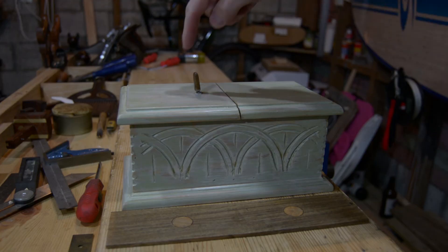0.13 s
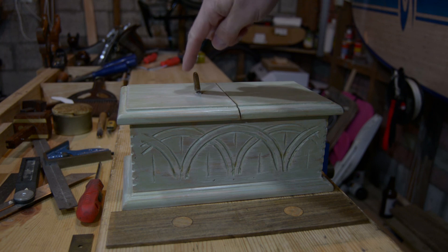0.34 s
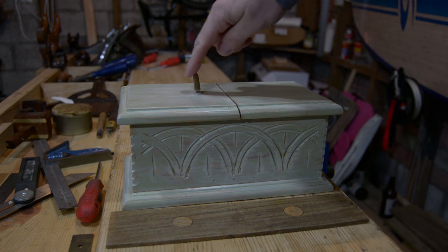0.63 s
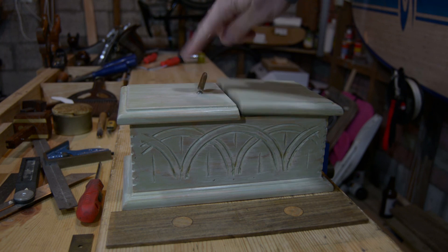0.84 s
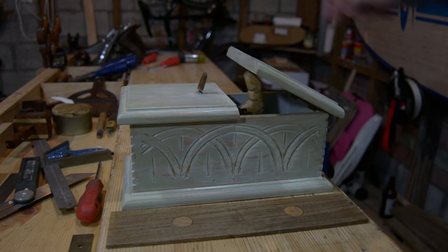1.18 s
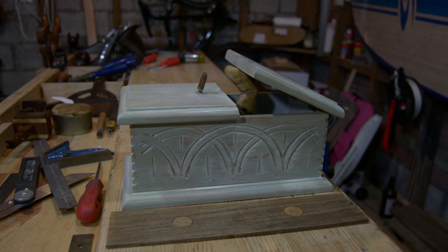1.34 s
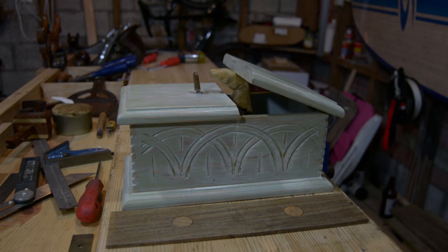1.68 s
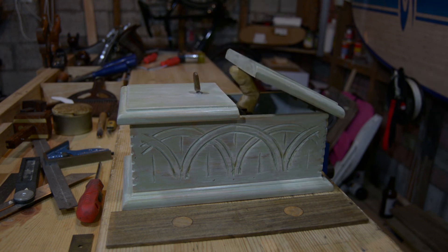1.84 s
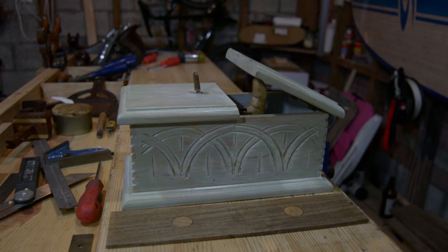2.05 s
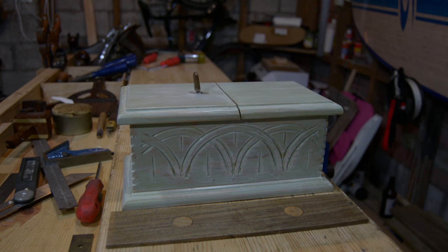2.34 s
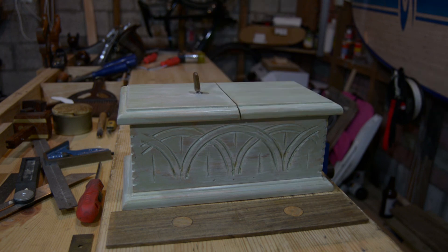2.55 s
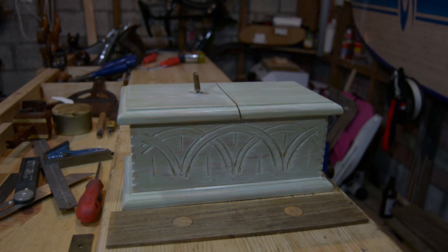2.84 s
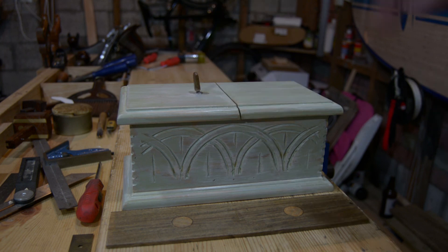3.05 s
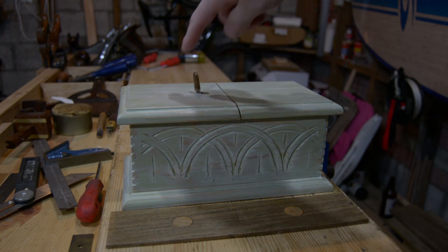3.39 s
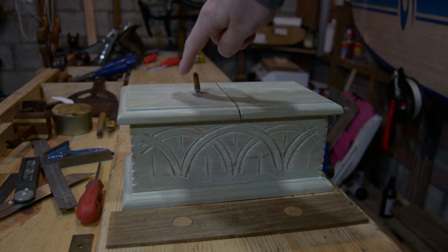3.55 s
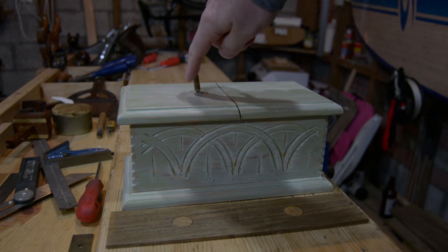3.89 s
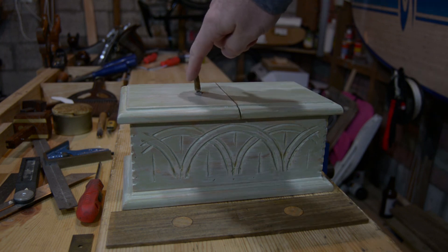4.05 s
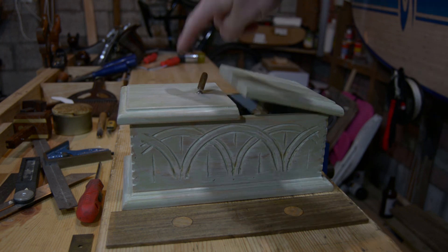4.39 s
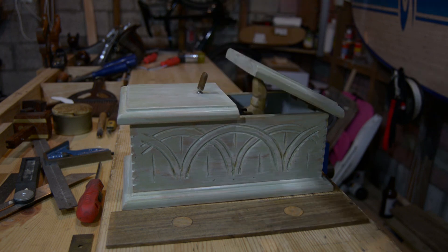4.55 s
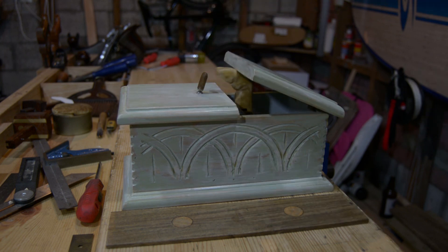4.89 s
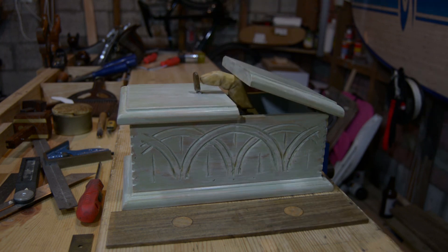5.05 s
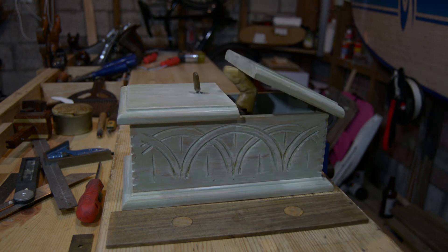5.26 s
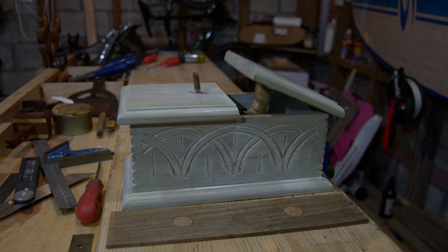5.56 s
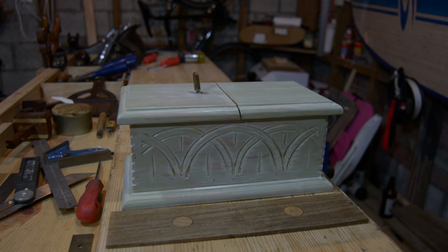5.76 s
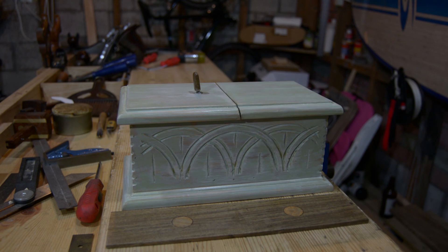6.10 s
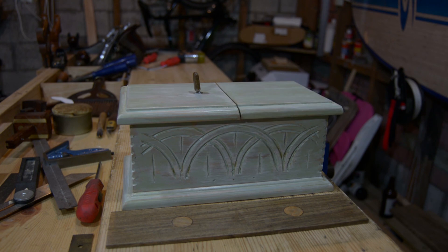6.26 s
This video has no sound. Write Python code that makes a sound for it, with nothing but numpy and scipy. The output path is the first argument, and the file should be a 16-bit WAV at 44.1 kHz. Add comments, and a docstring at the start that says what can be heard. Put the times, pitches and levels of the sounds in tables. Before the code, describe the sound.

A close microphone in a small, fairly dry workshop, with very quiet air and faint hum. A soft sleeve rustle opens, with tiny ticks near 0.7 s. At 0.78 s a toggle switch snaps on and a small geared servo starts at once, whining and buzzing; its arm knocks the wooden lid at 0.82 s. The whir sags under load, then runs freely with a rattly plastic edge. Clunks on the lever at 1.34-1.58 s lead to a loud snap at 1.6 s. The motor reverses, slightly higher, with the lid chattering on the retreating arm, until it claps shut at 2.29 s, bounces and rings briefly. Small ticks follow, then quiet with faint rustles and ticks from about 3.1 s. The cycle repeats: snap at 4.25 s, knock at 4.29 s, clunks from 4.8 s, snap back at 5.07 s, chatter, and final clap at 5.76 s, a few ticks, then still air.

```python
"""On a bench in a small workshop, a wooden box switches itself off, twice. A sleeve rustles, a finger
flips the toggle switch and a small geared servo whirs: its arm knocks the lid up, pushes the switch
back and retreats until the lid claps shut. Tooth-rate harmonics make the whine and uneven tooth blows
the rattle of walls and gear case; coloured noise bursts make the contacts, decaying modes the box's ring.
At the microphone the direct sound outweighs the room's short tail; still air and a faint hum lie below."""
import sys
import numpy as np
from scipy import signal
from scipy.fft import rfft, irfft, next_fast_len
from scipy.io import wavfile
from scipy.ndimage import uniform_filter1d, map_coordinates

SR = 44100
rng = np.random.default_rng(int(sys.argv[2]) if len(sys.argv) > 2 else 0)


def transcribe(signal):
    """Save signal, clipped to [-1, 1], as a 16-bit WAV file at the path in sys.argv[1]."""
    frames = np.atleast_2d(signal).T
    limited = np.clip(frames, -1, 1)
    pcm = np.round(limited * 32767).astype(np.int16)
    wavfile.write(sys.argv[1], SR, pcm)


N = 283563

# All levels are set ahead of the recorder; colours and rows are relative where a function adds a gain.
# Room tone: still air (frequency [Hz], relative level [dB]) and hum (frequency [Hz], mean level [dB])
AIR_COLOUR = [(20, -16), (50, -8), (80, -8), (115, -4), (150, -9.5), (300, -13), (450, -19), (800, -24.5),
              (2500, -31), (4000, -32.5), (6500, -36), (16000, -39)]
HUM_TONES = [(48.4, -85), (118.4, -74.5)]
AIR_DB = -72  # rms
# The workshop's decay: (frequency [Hz], t60 [s])
ROOM_DECAY = [(150, 0.45), (700, .26), (3000, .31), (6000, 0.36), (9000, 0.2), (14000, 0.12)]

# A sleeve rustles as the hand reaches for the switch: (time [s], relative level [dB])
SWISHES = [(0, -59), (.53, -71.5), (.73, -73.5), (3.12, -71.5), (3.34, -77.5), (3.73, -77)]
# Colour of the cloth: (frequency [Hz], level [dB])
CLOTH_COLOUR = [(150, -15.5), (500, -3.5), (1400, 1), (2300, -5.5), (3700, 0), (5000, -8.5), (8000, -16),
                (16000, -22.5)]
SWISH_RISE_DB_PER_S, SWISH_FALL_DB_PER_S = 163, 74.5

# Contacts, each: (time [s], relative level [dB], relative treble level [dB])
# followed by the colour of the struck body: (frequency [Hz], level [dB])
# light ticks of the switch lever and the settling gears
TICKS = [(.654, -56, -18.5), (.719, -48.5, 5.5), (.737, -53, 18.5), (2.452, -45.5, -6), (2.464, -42, 4.5),
         (3.327, -62.5, 0), (3.709, -62, -2), (3.74, -62, 4), (3.962, -62.5, -2.5), (3.986, -57.5, 6),
         (4.001, -59.5, 7), (4.153, -55, -9.5), (4.176, -60, 5), (4.19, -63, -11), (5.918, -40.5, -7),
         (5.927, -42, 3), (5.934, -47, -3)]
TICK_COLOUR = [(200, -11), (900, 2), (1700, -3), (3200, 1.5), (4500, -10), (10000, -19), (16000, -26.5)]
# the toggle switch snaps on and off
SNAPS = [(0.78, -25, 1.5), (1.603, -21.5, -1), (4.254, -24, 4), (5.071, -22.5, -8)]
SWITCH_COLOUR = [(120, -41.5), (200, -12.5), (456, -21.5), (763, -1), (968, -5), (1200, -11), (1500, -4.5),
                 (1800, 0), (2000, -5), (2250, -3), (2560, -20), (3190, -11), (4680, -20.5), (7010, -34.5),
                 (7830, -32.5), (9930, -26), (16000, -40)]
# the arm knocks and slips against the lid
KNOCKS = [(.821, -22.5, -4.5), (.828, -26, -13.5), (.851, -36.5, 7.5), (4.294, -24, -18.5),
          (4.301, -27.5, -2), (4.323, -37.5, 12.5)]
LID_COLOUR = [(90, -35), (160, -9.5), (260, -18), (380, -7.5), (560, -12), (800, -8), (1000, 9), (1250, -9),
              (1900, -8.5), (3300, -12), (5000, -32.5), (10000, -22.5), (16000, -34.5)]
# the box rocks softly on the bench
BUMPS = [(.895, -55.5, -1), (3.058, -58, 0), (3.99, -57, 2), (4.368, -39.5, -1.5)]
BENCH_COLOUR = [(40, -22), (90, -7), (170, -0.5), (300, -6.5), (500, -21), (2000, -18.5), (8000, -57)]
# the arm clunks against the switch lever and leans on it
CLUNKS = [(1.341, -34.5, 10.5), (1.449, -37.5, -8), (1.466, -34.5, 0), (1.524, -38.5, 9.5),
          (1.58, -38.5, -3), (4.81, -32, 15), (4.917, -35.5, 1), (4.936, -36, -4), (4.992, -33.5, 21),
          (5.048, -38, 7)]
ARM_COLOUR = [(100, -26.5), (280, -18.5), (380, 2.5), (520, -12.5), (700, -5), (860, -1.5), (1100, -11),
              (1600, -11.5), (2500, -15.5), (6000, -25), (16000, -41)]
# the retreating arm and the lid resting on it chatter
CHATTERS = [(1.638, -31.5, -9), (1.73, -31.5, -9), (1.863, -31.5, -9), (1.885, -30.5, -9),
            (2.1003, -36, -2), (2.12, -32.5, -7), (2.136, -31.5, -8), (2.1541, -32, -6),
            (2.1726, -32.5, -4), (2.1945, -28.5, -6), (2.2145, -34, -5), (2.2589, -36, 2),
            (5.108, -31, -12), (5.15, -30, -9), (5.187, -29, -10), (5.354, -28, -6), (5.384, -31, -6),
            (5.5378, -34.5, -1), (5.5747, -36, 2), (5.5867, -31, -3), (5.6052, -30, -2),
            (5.6411, -29.5, -2), (5.7314, -31, 5)]
CHATTER_COLOUR = [(300, -22), (900, 2), (1300, -4.5), (2800, 3.5), (4500, -8), (7500, -15), (10500, -13.5),
                  (16000, -22)]
# the lid bounces after each clap
BOUNCES = [(2.2978, -21, -12.5), (2.3077, -37, 16.5), (2.313, -29, -12.5), (2.329, -33, -12),
           (5.7668, -20, -10), (5.7795, -28.5, -3.5)]
WOOD_COLOUR = [(40, -35.5), (105, -29.5), (150, -2.5), (220, -2), (280, -5.5), (520, -7.5), (720, -4),
               (1000, -1.5), (1600, -6.5), (2500, -5.5), (3700, -6), (4500, -18), (10500, -21),
               (16000, -35.5)]
# The lid claps on the box: (time [s], relative level [dB])
CLAPS = [(2.292, -17.5), (5.76, -17.5)]
# Modes of the shut box: (frequency [Hz], relative level [dB], t60 [s])
BOX_MODES = [(185, 9.5, .06), (174.5, 2, 0.34), (226.7, 4, 0.34), (323, -2, 0.5), (372.5, 2, 0.42),
             (575, -5, 0.38), (888, 3, 0.21), (930, 2, .15), (1020, -2.5, 0.39), (1336, -7, .2),
             (1530, -7, .22), (1910, -9.5, .26), (2810, -1.5, .15), (3370, -8, .2), (3880, -8.5, .2),
             (4000, -5, 0.51), (4100, -1.5, 0.33)]

# The motor is powered: (start [s], reversal [s], stop [s])
RUNS = [(.771, 1.604, 2.293), (4.245, 5.073, 5.76)]
# The servo running free, out and back: (tooth rate [Hz], share of it reached at once, spin-up [s],
# wooden walls [dB], gear case [dB], tooth fizz [dB], second, third and fourth harmonic [dB]), all relative
OUT = (1512, .5, 0.03, -52.5, -41, -46.5, -9.5, -6, -12.5)
BACK = (1606, 0.44, 0.0369, -44.5, -37.5, -48.5, -3, -14, -22)
# What the arm meets in every run, by row: heaves the lid open; takes its full weight; jolt of setting it
# moving; raised lid buzzes on the arm; slack; grinds on the lever; pushes the switch over; lever gives way;
# strains gathering speed backwards; slides back under the lid; sinking lid pushes the arm; slack again;
# whine thins a little; judders under the lid's weight; teeth scrape as the lid leaves the arm.
# (time after start [s], attack [s], hold [s], release [s], sag [Hz], walls [dB], case [dB], fizz [dB],
# second, third and fourth harmonic [dB]); a negative sag speeds the gears up
LOADS = [(.066, .03, .102, .15, 285, -3, 8, 5, 8.5, 2.5, 5),
         (.08, .024, .014, .03, 80, -1, 2, -1, -4, 6, 7),
         (.045, .02, .015, .012, 0, 2.5, 3, -1, -0.5, 5.5, -1.5),
         (.248, 0.033, 0.027, 0.097, 0, 7, 0.5, 0, 1.5, -2.5, -3),
         (.689, .03, .015, .02, -15.5, 1.5, -3, -4.5, -1.5, 0, -1),
         (.745, .016, .03, .02, -45, 6.5, 4.5, 6, 5, 2, 9),
         (.76, .028, .035, .008, 140, -3, 5, 0.5, 4.5, 0.5, 3.5),
         (.802, .02, .008, .012, 150, -3, -1.5, -6.5, -13, -4, -15),
         (.852, 0.022, .01, 0.052, 0, 1.5, 4, 0, 4, 9, 14), (.972, .07, .01, .07, 66, 0.5, 2.5, 2, 6, 4, 0),
         (1.25, .25, .03, .02, -95, -2.5, -7, -3, -16, -5, -12),
         (1.279, .04, .003, .035, -20, -1, -6, -6, -7, .5, 0),
         (1.12, .03, .1, .03, 0, -0.5, -0.5, -0.5, -2.5, 0, 0),
         (1.347, .03, .04, .03, 0, 4, 1, -3, 1.5, 0, 0), (1.465, .025, .02, .02, 0, -5, -1, 1.5, 3, 0, 0)]
GRIP = 2.8  # how soon a growing load presses the teeth fully together
WALLS_DB_PER_OCTAVE, CASE_DB_PER_OCTAVE, FIZZ_DB_PER_OCTAVE = 8, 7.5, 12.5  # faster gears are louder
WAVER, WAVER_PER_S = .014, 20  # random share of the outward speed, knots a second
# Whine of a harmonic as it crosses resonances of the gear case: (frequency [Hz], relative level [dB])
WHINE = [(1200, -58.5), (1400, -56), (1500, -54.5), (1560, -53.5), (1610, -47.5), (1680, -55), (2000, -54),
         (2280, -45.5), (2430, -35.5), (2570, -41), (2740, -31.5), (3000, -38), (3200, -41.5), (3410, -32),
         (3560, -37.5), (3720, -34), (3900, -41), (4150, -44), (4900, -55.5), (5400, -47), (5750, -40),
         (6300, -48)]
# Colours of the rattling walls, gear case and tooth fizz, out and back: (frequency [Hz], level [dB])
WALLS_OUT = [(65, -49.5), (110, -4), (275, -29), (378, -0.5), (493, -18.5), (575, -11.5), (751, -10.5),
             (831, 2), (993, -9), (1400, -7), (1490, -4.5), (1780, -4.5), (1950, -2.5), (2190, -12),
             (2300, -1.5), (2990, -30.5), (5060, -120)]
WALLS_BACK = [(65, -55), (110, -16.5), (155, -14), (242, -27), (378, -9.5), (408, -12.5), (560, -19),
              (820, 2), (909, -4), (1020, 3.5), (1190, -8.5), (1470, -7.5), (1650, 3.5), (2080, -6),
              (2300, -10), (2990, -38), (5060, -120)]
CASE_OUT = [(1240, -37), (2100, -17), (2230, -23), (2440, 3), (2900, 4.5), (3170, -8), (3350, 8), (3590, 4),
            (4020, -5.5), (4390, -4.5), (4800, -21.5), (6240, -45.5), (10600, -120)]
CASE_BACK = [(1240, -42.5), (2100, -16), (2430, 0), (2620, -2), (2830, 5.5), (3080, -4), (3200, -1.5),
             (3380, -4.5), (3720, -5), (4490, -14.5), (4800, -19), (6240, -51), (10600, -120)]
FIZZ_OUT = [(3200, -27.5), (4500, -9.5), (4950, -1.5), (5450, 4), (6000, -1.5), (6550, 2.5), (7400, -9),
            (8000, -5.5), (8700, -10.5), (9500, -4.5), (10500, -9.5), (11300, -7), (12600, -14),
            (15800, -17)]
FIZZ_BACK = [(3200, -22), (4500, -2.5), (4950, 2), (5400, 2.5), (6150, -5), (6550, -1), (7050, -2.5),
             (7600, -8), (8600, -8), (9600, -3.5), (10500, -11), (11900, -4.5), (13300, -12), (15800, -15)]

TOP_HZ = 15900  # upper edge of the recorder's band


def amp(db):
    """Decibels to gain."""
    return 10 ** (np.asarray(db) / 20)


def unit(x):
    """Scale to rms 1."""
    return x / np.sqrt(np.mean(x ** 2) + 1e-20)


def along(points, hz):
    """Read (frequency [Hz], value) points on a log frequency axis."""
    f, v = np.transpose(points)
    return np.interp(np.log(hz + 1), np.log(f + 1), v)


def wobble(rate):
    """A smooth random curve with rate knots a second."""
    coarse = np.arange(0, N + 16, 16)
    knots = rng.standard_normal(int(N * rate / SR) + 4)
    curve = map_coordinates(knots, [coarse * rate / SR])
    return np.interp(np.arange(N), coarse, curve)


def coloured(x, spectrum, size=4096):
    """Pass x through a causal, minimum-phase body of the given colour."""
    level_db = along(spectrum, np.fft.rfftfreq(size, 1 / SR))
    cepstrum = irfft(np.log(amp(np.maximum(level_db, -100))))
    # folding the cepstrum forward makes the response causal
    cepstrum[1:size // 2] *= 2
    cepstrum[size // 2 + 1:] = 0
    response = irfft(np.exp(rfft(cepstrum)))
    return signal.fftconvolve(x, response)[:len(x)]


def add(track, s, sound):
    """Mix a sound into the track at s seconds."""
    part = track[round(s * SR):][:len(sound)]
    part += sound[:len(part)]


def impacts(turns, scatter, spread_db):
    """One impulse per whole count of turns, uneven in time, size and sign."""
    at = np.flatnonzero(np.diff(np.floor(turns)))
    late, size = rng.standard_normal((len(at), 2)).T
    when = np.clip(at + scatter * late / np.diff(turns)[at], 0, N - 1).astype(int)
    force = amp(spread_db * np.minimum(size, 2)) * rng.choice([-1, 1], len(at))
    return np.bincount(when, force, N)


def strikes(rows, spectrum, t60, treble_t60, gain_db, split_hz=4500):
    """Each contact is a noise burst in a body's colour; its treble dies first."""
    track, t = np.zeros(N), np.arange(SR // 4) / SR
    lowpass = signal.butter(2, split_hz, fs=SR, output="sos")
    for s, db, treble_db in rows:
        noise = rng.standard_normal(len(t))
        body = signal.sosfiltfilt(lowpass, noise)
        treble = (noise - body) * amp(treble_db + 4.0 - 60 * t / treble_t60)
        hit = coloured(body * amp(-60 * t / t60) + treble, spectrum)
        strength = np.sqrt(np.sum(hit ** 2) / (SR * t60 / 10))
        add(track, s, amp(db + gain_db) * hit / strength)
    return track


def room_tone():
    """Still air as coloured noise, with faint hum tones wavering in level and phase."""
    t = np.arange(N) / SR
    hum = np.zeros(N)
    for hz, db in HUM_TONES:
        level = amp(db + 1.1 * wobble(5.5)) * np.sqrt(2)
        hum += level * np.sin(2 * np.pi * hz * t + wobble(8.4))
    return hum + amp(AIR_DB) * unit(coloured(rng.standard_normal(N), AIR_COLOUR))


def sleeve(fibres_hz=3000, spread_db=6):
    """Countless fibres catch and slip while the cloth moves; each swish rises quickly and dies away."""
    t = np.arange(N) / SR
    slips = impacts(t * fibres_hz, scatter=0.93, spread_db=spread_db)
    motion = np.zeros(N)
    for s, db in SWISHES:
        drop_db = np.maximum(SWISH_RISE_DB_PER_S * (s - t), SWISH_FALL_DB_PER_S * (t - s))
        motion += amp(db - drop_db)
    return motion * unit(coloured(slips, CLOTH_COLOUR))


def lever_and_gear_ticks():
    """The switch lever and settling gears tick as light, short bursts."""
    return strikes(TICKS, TICK_COLOUR, t60=.04, treble_t60=0.027, gain_db=-7)


def drive():
    """The motor spins up after each start or reversal and sags under load, changing the gears' levels."""
    t = np.arange(0, N / SR, .001)
    # each run's settings take over shortly before its start
    run = np.maximum(np.searchsorted([row[0] - .1 for row in RUNS], t) - 1, 0)
    start, reverse, _ = np.array(RUNS)[run].T
    back = t > reverse
    free_hz, start_share, spin_up, *levels = np.where(back, np.array(BACK)[:, None], np.array(OUT)[:, None])
    running = np.maximum(t - np.where(back, reverse, start), 0)
    tooth_hz = free_hz * (1 - (1 - start_share) * np.exp(-running / spin_up))
    for s, attack, hold, release, sag_hz, *change_db in LOADS:
        corners = s + np.cumsum(np.abs([0, attack, hold, release]))
        load = np.interp(t - start, corners, [0, 1, 1, 0])
        tooth_hz = tooth_hz - sag_hz * load
        levels = levels + np.outer(change_db, np.tanh(GRIP * load))
    tooth_hz = np.maximum(tooth_hz, free_hz / 10)
    slopes = [WALLS_DB_PER_OCTAVE, CASE_DB_PER_OCTAVE, FIZZ_DB_PER_OCTAVE, 0, 0, 0]
    levels = levels + np.outer(slopes, np.log2(tooth_hz / free_hz))

    def smooth(curve, size):
        """Average over size milliseconds and bring to the sample rate."""
        return np.interp(np.arange(N) / SR, t, uniform_filter1d(curve, size))

    return smooth(tooth_hz, size=1), smooth(1. * back, size=14), [smooth(db, size=7) for db in levels]


def gear_whine(turns, harmonics_db, back, rough=.16, blur=0.44, eccentric=0.13, grip_db=2.5,
               fade_db=1.5, upper_db=-22, back_db=-12):
    """Harmonics of the tooth rate; uneven teeth blur the third and up, the fifth and up fade going back."""
    angle = 2 * np.pi * turns + eccentric * np.sin(2 * np.pi * turns / 10) + rough * wobble(600)
    highest_db = np.maximum(harmonics_db[1], harmonics_db[2]) + upper_db + back_db * back
    fade = unit(amp(fade_db * wobble(24)))
    whine = np.zeros(N)
    for k, db in enumerate(harmonics_db + [highest_db] * 3, 1):
        grip = unit(amp(grip_db * wobble(120)))
        whine += amp(db) * fade * grip * np.sin(k * angle + (k > 2) * blur * wobble(350))
    return whine


def rattle(turns, worn, count=10, size=5):
    """Backlash: random blows plus a share of worn-tooth pattern, repeating each turn and slowly changing."""
    at = np.flatnonzero(np.diff(np.floor(turns)))
    force = rng.standard_normal((len(at) // count + 1, count))
    force = uniform_filter1d(force, size, axis=0).ravel()[:len(at)]
    late = rng.random(count)[np.arange(len(at)) % count]
    when = np.clip(at + late / np.diff(turns)[at], 0, N - 1).astype(int)
    pattern = np.bincount(when, force, N)
    blows = impacts(turns, scatter=.45, spread_db=6.0)
    return np.sqrt(worn) * unit(pattern) + np.sqrt(1 - worn) * unit(blows)


def ringing(x, t60):
    """Many close, short-lived modes of a thin plastic part, as decaying noise."""
    t = np.arange(SR // 10) / SR
    return signal.fftconvolve(x, rng.standard_normal(len(t)) * amp(-60 * t / t60))[:N]


def servo(flutter=.003, shaft_db=0.77, shaft_back_db=1.5, wheel_db=1.2, judder_db=1.0, lurch_db=1.74,
          lurch_hz=55, walls_db=-1, case_db=-2.0, fizz_db=-1):
    """Meshing teeth whine; their backlash rattles the walls and the gear case and fizzes above."""
    t = np.arange(N) / SR
    tooth_hz, back, (walls, case, fizz, *upper) = drive()
    # uneven friction makes the speed wander, half as much on the way back
    tooth_hz = tooth_hz * (1 + WAVER * (1 - back / 2) * wobble(WAVER_PER_S))
    harmonics_db = [db + along(WHINE, k * tooth_hz) for k, db in enumerate([0] + upper, 1)]
    _, second_db, third_db, _ = harmonics_db
    turns = np.cumsum(tooth_hz * (1 + flutter * wobble(90))) / SR  # counted in teeth
    powered = uniform_filter1d(sum(1. * ((t > a) & (t < b)) for a, _, b in RUNS), size=90)
    # the pinion presses harder once a turn, and the drive judders
    pinion_db = (shaft_db * (1 - back) + shaft_back_db * back) * np.sin(2 * np.pi * turns / 10)
    # the next, slower wheel binds once a turn on the way out
    wheel = (1 - back) * np.sin(2 * np.pi * turns / 31)
    pressure = unit(amp(pinion_db + wheel_db * wheel + judder_db * wobble(150)))
    scrape = unit(amp(2.6 * wobble(110)))

    def flanks(blows, out, home):
        """The teeth bear on their other flanks on the way back, which changes the colour."""
        return (1 - back) * unit(coloured(blows, out)) + back * unit(coloured(blows, home))

    # a cleanly singing gear rattles less
    sung_share = (amp(second_db) ** 2 + amp(third_db) ** 2) / amp(case) ** 2
    case = case + 10 * np.log10(np.clip(1 - sung_share, .3, 1))
    # the sharpest contacts also ring the wheels themselves
    clicks = impacts(turns, scatter=.4, spread_db=3.0)
    clicks = unit(clicks) + .55 * unit(ringing(clicks, t60=.04))
    # the arm lurches in its play and presses unevenly on the walls
    lurch = unit(amp(lurch_db * wobble(lurch_hz)))
    noise = amp(walls + walls_db) * lurch * flanks(rattle(turns, worn=0.27), WALLS_OUT, WALLS_BACK)
    noise += amp(case + case_db) * flanks(rattle(turns, worn=0.16), CASE_OUT, CASE_BACK)
    noise += amp(fizz + fizz_db) * scrape * flanks(clicks, FIZZ_OUT, FIZZ_BACK)
    return powered * pressure * (gear_whine(turns, harmonics_db, back) + noise)


def switch_snaps():
    """The toggle switch snaps over with a short burst in its own colour."""
    return strikes(SNAPS, SWITCH_COLOUR, t60=0.028, treble_t60=0.018, gain_db=-2.5)


def lid_knocks():
    """The arm's knocks and slips excite the lid."""
    return strikes(KNOCKS, LID_COLOUR, t60=.036, treble_t60=0.019, gain_db=0.1)


def bench_bumps():
    """The rocking box thuds softly, its low end outlasting the treble."""
    return strikes(BUMPS, BENCH_COLOUR, t60=0.13, treble_t60=0.038, gain_db=-2.5)


def arm_clunks():
    """The arm meets the switch lever with a clunk and a brief treble."""
    return strikes(CLUNKS, ARM_COLOUR, t60=0.078, treble_t60=0.018, gain_db=-4.5)


def arm_and_lid_chatter():
    """The retreating arm rattles in its play, and the lid resting on it chatters, in short bursts."""
    return strikes(CHATTERS, CHATTER_COLOUR, t60=0.046, treble_t60=.015, gain_db=-6.0)


def lid_claps():
    """The falling lid cracks on the rim of the box and bounces."""
    contacts = [(s, db, 0) for s, db in CLAPS] + BOUNCES
    return strikes(contacts, WOOD_COLOUR, t60=0.036, treble_t60=0.01, gain_db=-0.5)


def box_ring(ring_db=-23, attack_s=0.0042):
    """The shut box rings on; the lid, lying loose on it, blurs the tones, the high ones most."""
    track, t = np.zeros(N), np.arange(SR // 2) / SR
    onset = 1 - np.exp(-t / attack_s)
    for s, db in CLAPS:
        for hz, level_db, t60 in BOX_MODES:
            width_hz = 6 + .007 * hz
            drift = np.cumsum(rng.standard_normal(len(t))) * np.sqrt(2 * np.pi * width_hz / SR)
            phase = 2 * np.pi * (hz * t + rng.random()) + uniform_filter1d(drift, size=200)
            add(track, s, amp(db + ring_db + level_db - 60 * t / t60) * np.sin(phase) * onset)
    return track


def room(x, wet_db=-6, gap_s=.006):
    """The workshop's short tail follows the direct sound, each frequency dying at its own speed."""
    hz, t, z = signal.stft(rng.standard_normal(SR // 2), SR, nperseg=256)
    decay = amp(-60 * t / along(ROOM_DECAY, hz)[:, None])
    tail = signal.istft(z * decay, SR, nperseg=256)[1]
    tail = np.pad(tail / np.linalg.norm(tail), (round(gap_s * SR), 0))
    tail = coloured(tail, [(200, -5.5), (4000, -3.0), (8000, -9.0), (15000, -9.0)])
    return x + amp(wet_db) * signal.fftconvolve(x, tail)[:N]


def scene():
    """The contacts and servo sound in the room; the box's ring and the room tone join without its tail."""
    direct = sleeve() + lever_and_gear_ticks() + servo() + switch_snaps() + lid_knocks()
    direct += bench_bumps() + arm_clunks() + arm_and_lid_chatter() + lid_claps()
    return (room(direct) + box_ring() + room_tone())[None]


def record(dry, top=0.2, low_hz=38):
    """The recorder rounds off the highest peaks, rolls off the lows and cuts everything above its band."""
    rounded = dry / (1 + (dry / top) ** 4) ** (1 / 4)
    m = next_fast_len(N + SR // 2)
    hz = np.fft.rfftfreq(m, 1 / SR)
    band = hz ** 2 / np.hypot(hz ** 2, low_hz ** 2) * (hz < TOP_HZ)
    return irfft(rfft(rounded, m) * band, m)[..., :N]


dry = scene()
out = record(dry)
transcribe(out)
```